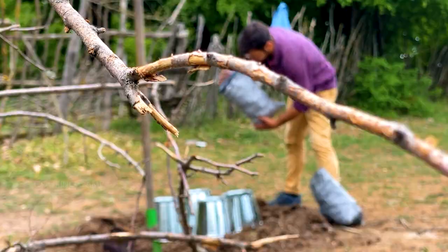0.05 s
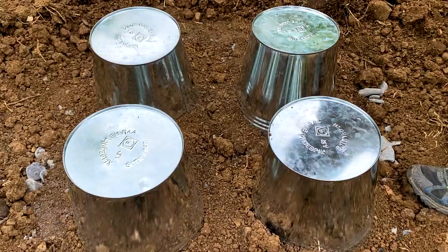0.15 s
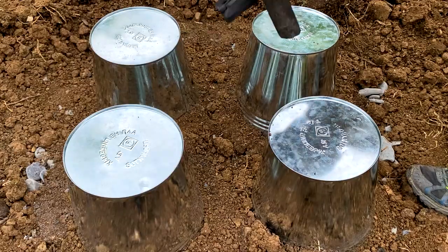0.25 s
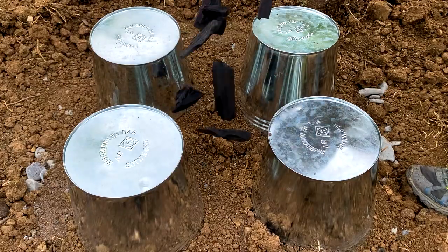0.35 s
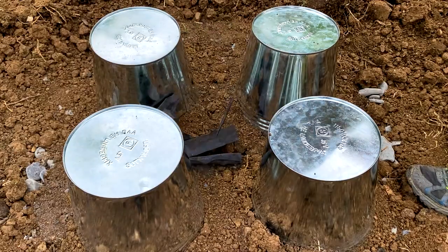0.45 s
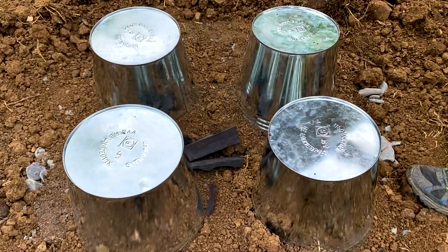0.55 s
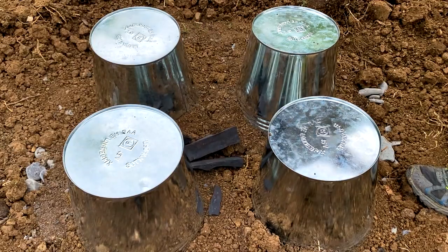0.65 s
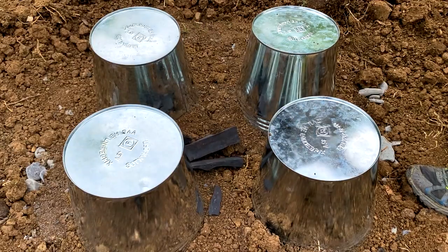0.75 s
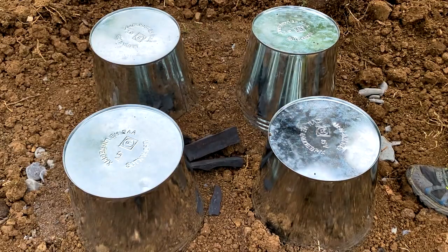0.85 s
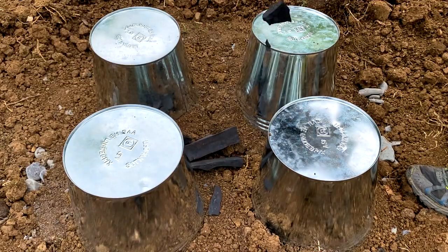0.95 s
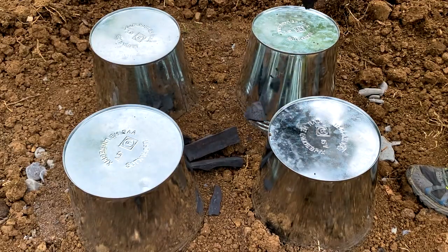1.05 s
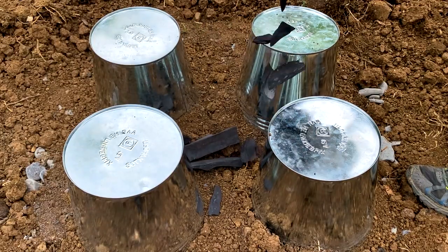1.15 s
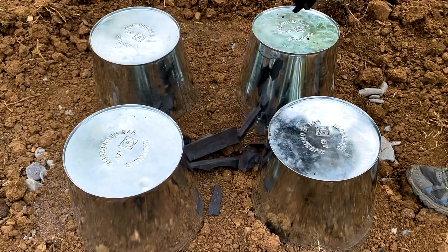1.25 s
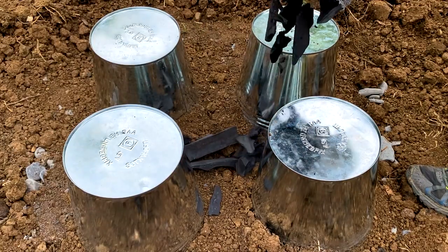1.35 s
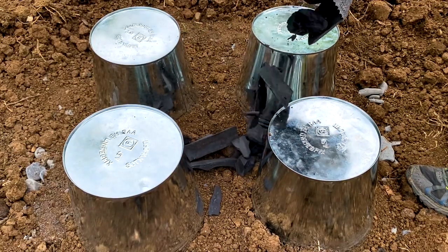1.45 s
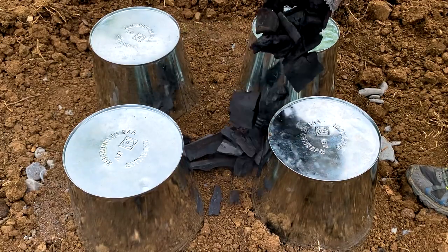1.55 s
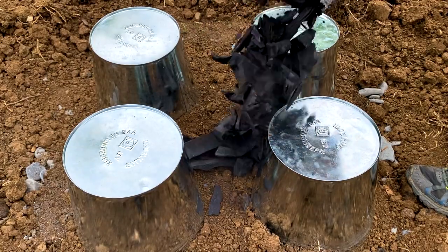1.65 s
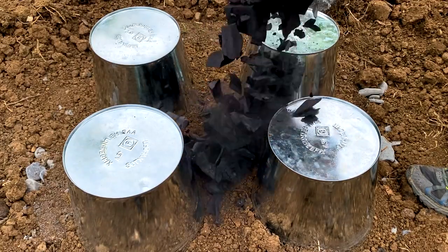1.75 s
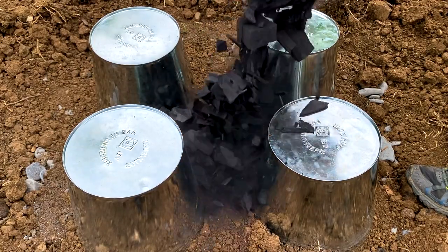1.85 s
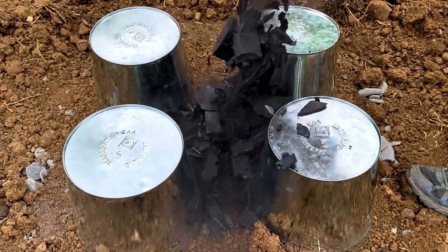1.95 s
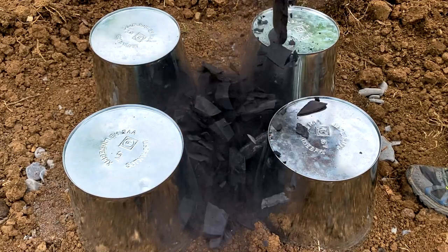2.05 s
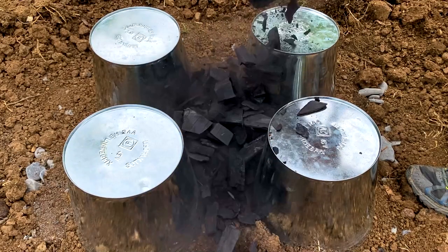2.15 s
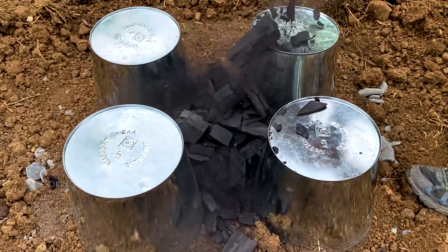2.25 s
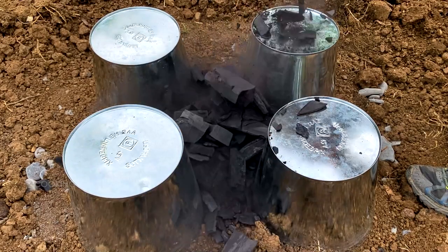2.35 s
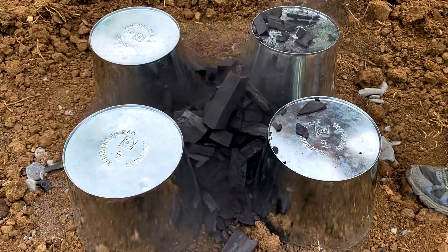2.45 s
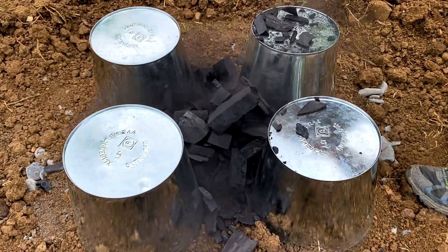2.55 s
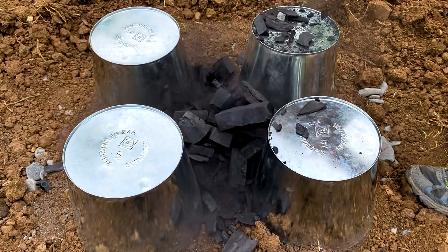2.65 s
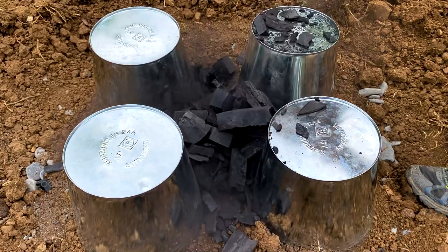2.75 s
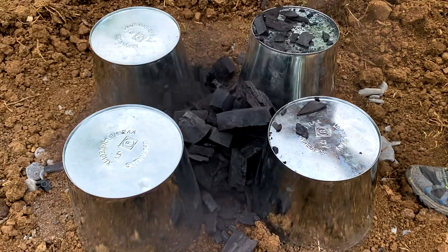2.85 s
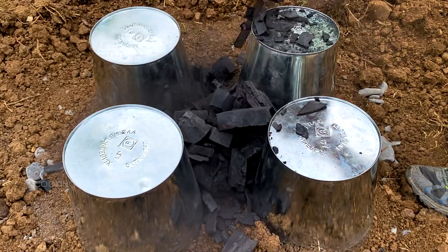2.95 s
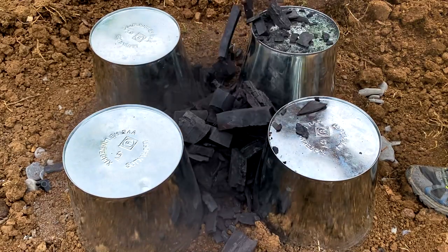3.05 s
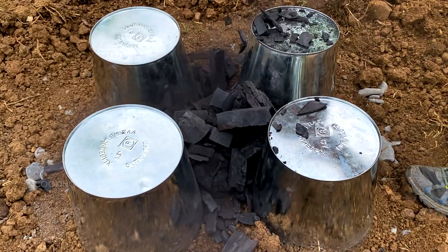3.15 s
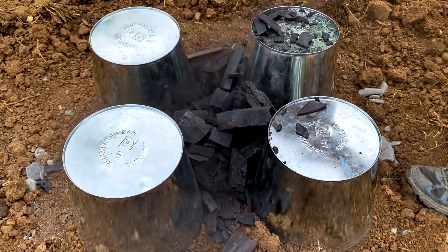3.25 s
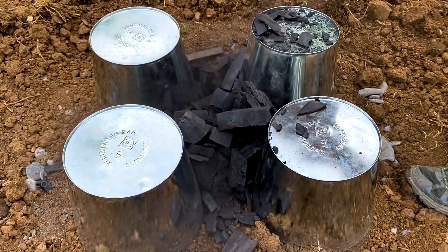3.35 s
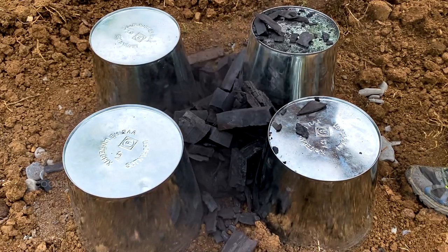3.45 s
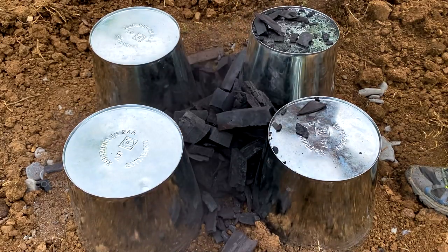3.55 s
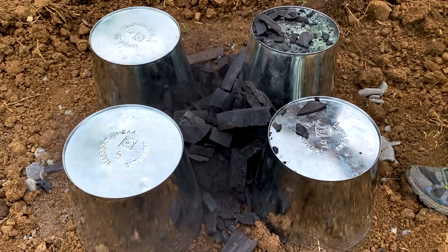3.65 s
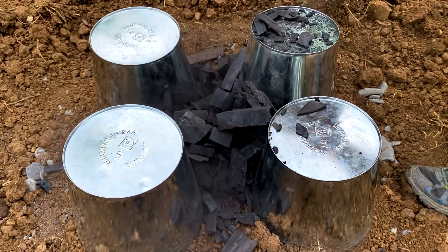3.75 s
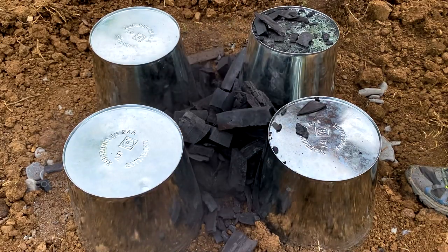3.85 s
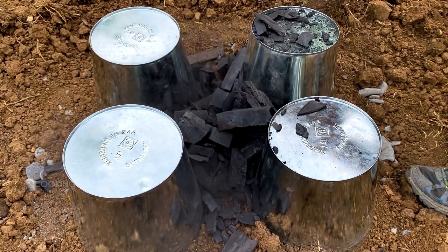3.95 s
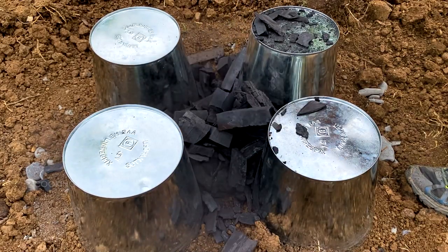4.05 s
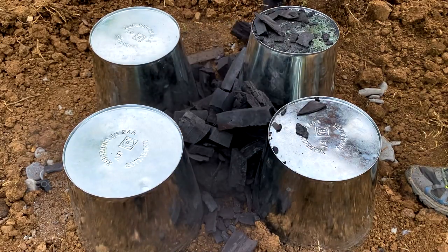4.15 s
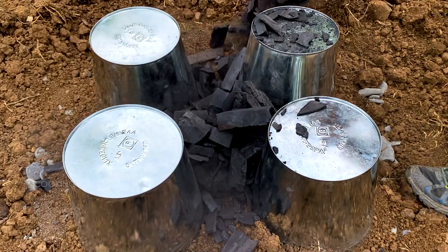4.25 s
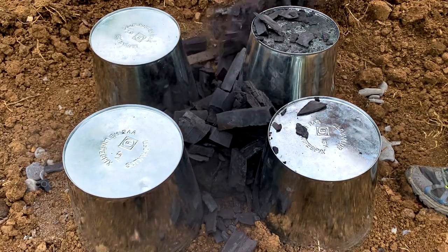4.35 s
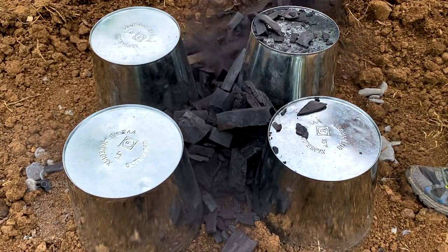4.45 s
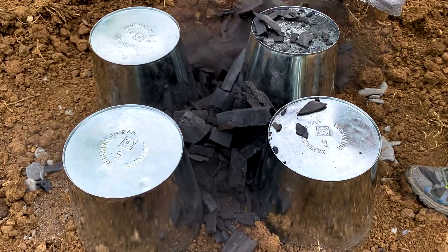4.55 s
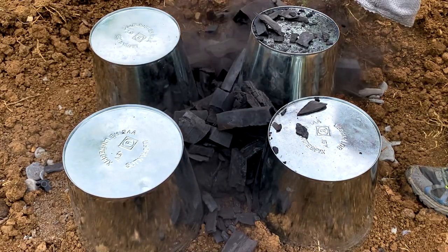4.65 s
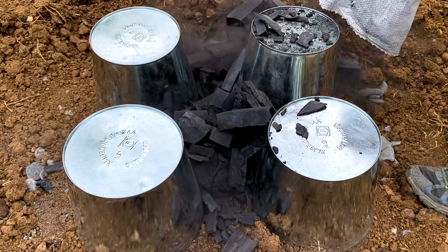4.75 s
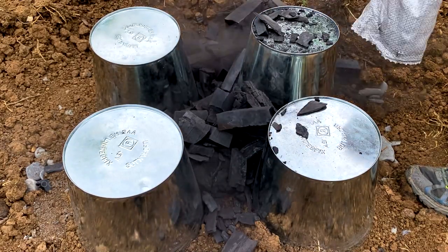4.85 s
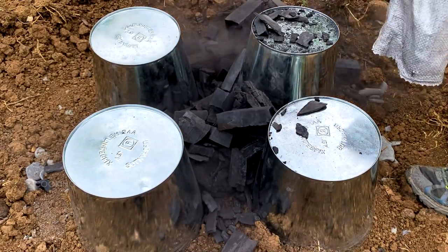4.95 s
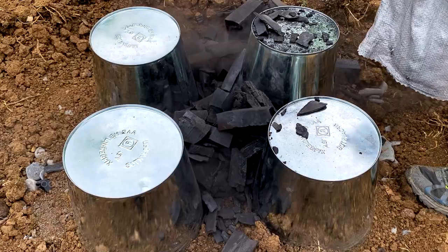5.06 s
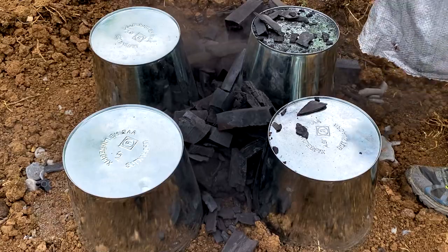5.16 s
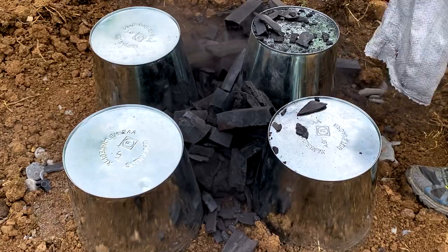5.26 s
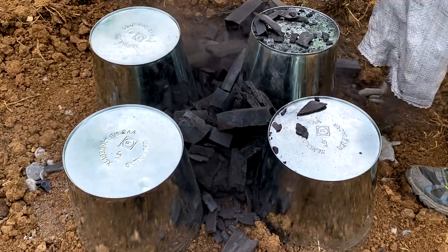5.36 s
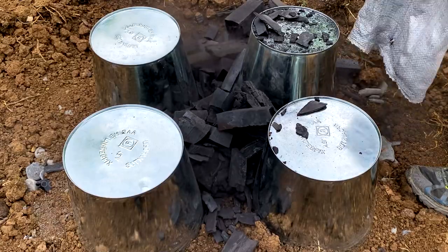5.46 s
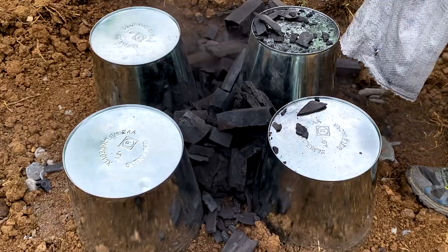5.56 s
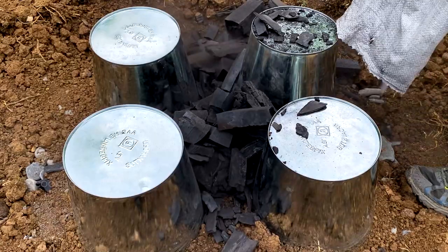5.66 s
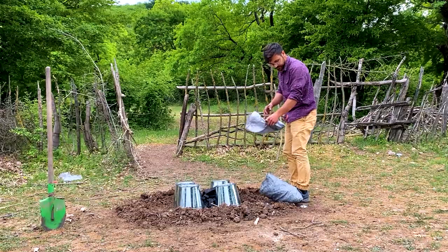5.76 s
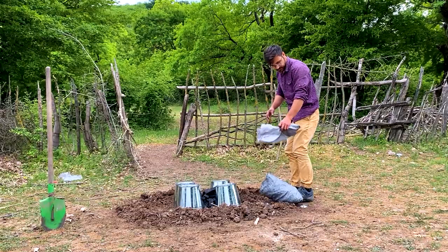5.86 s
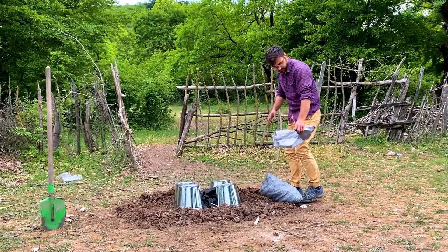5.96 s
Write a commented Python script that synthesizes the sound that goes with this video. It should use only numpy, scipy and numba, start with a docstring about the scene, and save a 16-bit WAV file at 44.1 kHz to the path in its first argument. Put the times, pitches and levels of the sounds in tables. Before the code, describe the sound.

Outdoors, charcoal pours in clattering bursts among upturned metal buckets, with dull thuds, brief metallic rings and gritty rustle thinning to near silence.

```python
"""Charcoal lumps slide out of a woven sack in surges and drop between upturned metal buckets on bare soil.
Brittle lumps crack into many short tones and clink; heavy ones thud with a low ring that swells and dies.
A few blows set the ringing tones of a bucket going. Grit and the sack rustle as a dense rain of tiny tones.
Behind it lie quiet open air and a far-off bass rumble, both made of filtered noise."""
import sys
import numpy as np
from scipy import signal
from scipy.fft import rfft, irfft
from scipy.io import wavfile
from scipy.ndimage import uniform_filter1d
from numba import njit

SR = 44100
rng = np.random.default_rng(int(sys.argv[2]) if len(sys.argv) > 2 else 0)


def file_out(sig):
    """Save sig as 16-bit WAV at sys.argv[1]."""
    # one column per channel
    cols = np.atleast_2d(sig).T
    # limit, then scale
    lim = np.clip(cols, -1, 1)
    pcm = np.round(lim * 32767).astype(np.int16)
    wavfile.write(sys.argv[1], SR, pcm)


N = 264908  # length in samples

# Table levels are relative settings: each layer trims them further.
# Spectrum of the open air: pitch_hz, density_db (per Hz)
AIR_SPECTRUM = [(90, -20), (150, -1), (1300, 0), (2500, -9), (16000, -13)]
# Far-off bass rumble over time: time_s, level_db
RUMBLE_LEVEL = [(0, -59), (1.05, -60), (1.3, -59), (5.719, -64.5), (5.8, -57)]
# Rustle of the sack and trickling grit: time_s, level_db, body_db (low chips beside the level)
RUSTLE_FLOW = [(.14, -40, -6), (.3, -46.5, 9), (.39, -52.5, 9), (.65, -44, 6), (1.0, -42.5, 9),
               (1.2, -37, 0), (1.42, -41, 10), (2.63, -43.5, 10), (3.1, -44.5, -3), (3.78, -44.5, 9.5),
               (4.66, -42.5, -52), (4.86, -47, 6), (5.199, -48.5, -26), (5.76, -52.5, 3)]
# Surges of charcoal out of the sack:
# start_s, length_s, first_level_db, last_level_db, body_db, treble_db
SACK_SURGES = [(0.417, 0.076, -23.5, -23, 8.5, -11), (1.27, 0.046, -26, -28.5, 6, -4),
               (1.438, 0.097, -28, -21, 2.5, -2), (1.591, 0.098, -24, -21.5, 6.5, -8),
               (1.736, 0.31, -23, -17.5, 5, -2.5), (2.118, 0.12, -28.5, -24.5, 10, -3),
               (2.224, 0.32, -35.5, -33.5, 11.5, -4.5), (2.839, 0.15, -37.5, -59, 8, 8),
               (3.261, 0.062, -34.5, -38, 5, -3.5), (3.837, 0.61, -39.5, -27, 2, 2.5),
               (4.456, 0.11, -19, -25, -1, -7), (5.318, 0.19, -53, -43.5, -19, 6)]
# Colour of the chips by pitch: pitch_hz, level_db
CHIP_COLOUR = [(250, -12), (1300, 0.5), (2800, 1.5), (6000, 1), (10500, -2), (15500, 1.5)]
# Ringing tones (modes), one list for each of three buckets: pitch_hz, level_db, t60_s (time to fall 60 dB)
BUCKET_MODES = [
    [(217, -17.5, 1.1), (471.5, -5, 0.62), (528, -3.5, 0.5), (607, -8, 0.57), (960, -11, 0.75),
     (1400, -16, 0.4), (1599, -13.5, 0.59)],
    [(603, -3, 0.46), (676, 8, 0.3), (1480, -4, 0.38), (2350, 2, 0.29), (2751, -4, 0.36)],
    [(170, -2, 0.27), (417, -2.5, 0.066), (760, -4, 0.16)],
]
# Lumps striking a bucket, one list for each bucket:
# start_s, blow_db, hardness_db (per octave above 600 Hz)
BUCKET_BLOWS = [
    [(.415, -39, 2), (.49, -30, -0.5)],
    [(2.125, -35.5, 0), (3.145, -32.5, -0.5)],
    [(2.245, -36, -6), (2.30, -19.5, 5), (2.405, -25.5, -2.5)],
]
# Heavy lumps landing on soil or heap: start_s, level_db, pitch_hz
HEAVY_LANDINGS = [(0.415, -31, 114), (0.416, -12.5, 340), (1.439, -22.5, 158), (1.441, -15, 372),
                  (1.605, -24, 173), (1.64, -16, 360), (1.643, -14.5, 151), (1.711, -12.5, 196),
                  (1.806, -21, 133), (1.839, -18, 188), (2.149, -29, 142), (2.242, -14.5, 380),
                  (2.245, -14, 140), (2.303, -20, 179), (2.374, -16, 178), (1.711, -16.5, 366),
                  (1.761, -21, 420), (2.043, -35, 175), (3.018, -31.5, 212), (3.143, -25.5, 171),
                  (4.23, -32.5, 117)]
# Lumps knocking together:
# start_s, level_db, body_db, treble_db, clink_hz, clink_db (beside the level), crumble_s
LUMP_KNOCKS = [(0.228, -43, -20, 3, 1150, 10, 0.038), (0.2695, -37, -21, 10, 1360, 0, 0.029),
               (0.4056, -30, 7, 5, 2970, -4, 0.037), (0.4122, -10.5, 2.5, -9.5, 3170, -9.5, 0.13),
               (0.4474, -22, 8, 0, 936, -2, 0.12), (0.4904, -30, 4, 2, 2080, 1, 0.17),
               (0.718, -42, 8, 8.5, 1223, 3, 0.12), (0.983, -34.5, 9, -23, 5150, 9, 0.056),
               (1.118, -24.5, 4.5, 6, 6560, 8.5, 0.041), (1.253, -33, -6, 8, 9130, 11, 0.057),
               (1.2995, -33, -6, 13.5, 1280, 6, 0.084), (1.3267, -25.5, -23, 1, 9830, 4, 0.028),
               (1.3546, -29.5, -6, 3, 14650, 19, 0.053), (1.372, -23.5, -51, 3.5, 2350, -1, 0.053),
               (1.438, -21.5, -33, -4, 1770, -3.5, 0.072), (1.4933, -21, -27, 0.5, 2570, 0, 0.11),
               (1.536, -21.5, -32, -34, 3960, 0.5, 0.13), (1.5795, -20.5, -25, -21, 2160, 12, 0.033),
               (1.597, -22, -6, 5, 2620, -1.5, 0.17), (1.6467, -20, -3, 2.5, 3550, 9.5, 0.045),
               (1.6607, -19.5, -22, 4.5, 1613, 1, 0.12), (1.702, -25.5, 4, -20, 890, 13, 0.058),
               (1.711, -14, 8.5, -6.5, 2135, -4, 0.13), (1.727, -29, -25, -26, 3370, 18, 0.052),
               (1.758, -27, 0, -8, 2660, 7, 0.098), (1.7961, -17, 8.5, 0.5, 2720, -5, 0.14),
               (1.8355, -17.5, 8, -7, 958, 3, 0.16), (1.897, -24.5, 13, 8.5, 2470, -8, 0.046),
               (1.9687, -19.5, -7, -4, 2980, -4, 0.11), (2.0206, -28.5, 8, -14, 998, 10.5, 0.09),
               (2.04, -18.5, -6, -1, 1937, 0, 0.085), (2.113, -20, -38, -6, 2500, -10, 0.21),
               (2.2457, -22.5, 21, -2, 1540, 10, 0.034), (2.3002, -23, 14.5, -6, 1380, 1, 0.25),
               (2.3671, -25, 21.5, -1.5, 970, 2, 0.11), (2.41, -30, 19, -20, 1596, 2, 0.18),
               (2.5091, -22.5, 13.5, -12, 1640, 1, 0.12), (2.581, -36, -20, -12, 2290, 9, 0.055),
               (2.6939, -31.5, 15.5, -30, 1425, 0, 0.094), (2.931, -28.5, -6, -8, 3740, -9, 0.13),
               (2.9515, -26, 6, 1, 1447, 7, 0.074), (3.0164, -32, 12.5, 2.5, 1640, -13, 0.15),
               (3.074, -33, -1, -7, 1450, -4.5, 0.16), (3.1422, -21.5, 14, 1.5, 2760, -8, 0.12),
               (3.203, -31, 16.5, -4, 1415, -4, 0.13), (3.288, -43.5, -8, -21, 1550, 13, 0.15),
               (3.309, -34.5, -8, -12, 2200, 7, 0.13), (3.4805, -50.5, -31, 8, 4600, 30.5, 0.005),
               (3.9455, -32.5, -34, -11, 4220, 4, 0.092), (4, -36.5, 5, 7, 9460, 12, 0.026),
               (4.2551, -30, -22, -5, 4860, 12, 0.029), (4.301, -26, 4, -16, 3120, 6, 0.03),
               (4.357, -19, -15, 1.5, 3240, -3, 0.088), (4.375, -25, -30, -8, 4070, 5, 0.041),
               (4.4545, -23.5, -26, -16, 1633, 4.5, 0.2), (4.48, -29, -22, -13, 2640, 15, 0.052),
               (4.501, -20, -35, 2, 2920, 2, 0.069), (4.7072, -45, -32, 10.5, 9800, 16, 0.011),
               (4.739, -41.5, -26, -17, 3740, 1, 0.033), (4.814, -42.5, 9, 7, 940, -16, 0.096),
               (4.844, -46, 24.5, 4, 625, -17, 0.066), (5.3282, -45.5, -20, 0, 5430, 7, 0.047),
               (5.961, -59.5, 22, -19, 990, 21, 0.047)]

AIR_DB = -56
BODY_FULL_HZ, BODY_NONE_HZ = 550, 1300  # body colour fades in below the second
TREBLE_NONE_HZ, TREBLE_FULL_HZ = 6500, 11000  # treble colour fades in above the first
RUSTLE_TREBLE_DB = 4
NEAR_START_S, NEAR_END_S = 0.141, 5.765  # the rustle is fainter outside these times
BEFORE_DB, AFTER_DB = -16, -42  # how much fainter
RISE_DB_PER_S, FALL_DB_PER_S = 1499, 232  # a surge sets in fast and peters out
THUD_CYCLES = 11  # a thud's ring falls 60 dB in this many swings
THUD_BUILD = 0.35  # build-up time as a share of the ring
SHAKE = 0.995  # how much of the ground's push is left one sample later
TOP_HZ = 15950  # the recorder cuts everything above


def undb(db):
    """Turn decibels into a plain amplitude factor."""
    return 10 ** (np.asarray(db) / 20)


@njit
def add(out, at, hz, t60, size):
    """Add dying sines of complex size (amount and phase), each run until it has fallen 50 dB."""
    for k in range(len(at)):
        step = np.exp(2j * np.pi * hz[k] / SR - np.log(1000) / (t60[k] * SR))
        swing = size[k]
        for i in range(at[k], min(len(out), at[k] + int(t60[k] * SR * 5 / 6))):
            out[i] += swing.imag
            swing *= step


def coloured(points):
    """Steady noise of rms 1, shaped to a spectrum of (pitch, dB) points."""
    hz, db = np.transpose(points)
    f = np.maximum(np.arange(N // 2 + 1) * SR / N, 1)
    gain = undb(np.interp(np.log(f), np.log(hz), db))
    noise = irfft(rfft(rng.standard_normal(N)) * gain, N)
    return noise / np.std(noise)


def air():
    """Quiet open air: a steady hiss, and bass noise whose level slowly changes."""
    s, db = np.transpose(RUMBLE_LEVEL)
    rumble_level = undb(np.interp(np.arange(N) / SR, s, db))
    rumble = rumble_level * coloured([(35, -37), (60, -7), (95, -4.0), (140, -5.5), (300, -65)])
    return undb(AIR_DB) * coloured(AIR_SPECTRUM) + rumble


def flow_at(s):
    """Level, body and treble of the stream at times s: powers add up and the louder part sets the colour."""
    t, db, body_db = np.transpose(RUSTLE_FLOW)
    far_db = (s < NEAR_START_S) * BEFORE_DB + (s > NEAR_END_S) * AFTER_DB
    power = undb(2 * (np.interp(s, t, db) + far_db))
    body = power * np.interp(s, t, body_db)
    treble = power * RUSTLE_TREBLE_DB
    for start, length, first_db, last_db, body_db, treble_db in SACK_SURGES:
        db = np.interp(s, [start, start + length], [first_db, last_db])
        db = db - RISE_DB_PER_S * np.maximum(start - s, 0)
        db = db - FALL_DB_PER_S * np.maximum(s - start - length, 0)
        surge = undb(2 * db)
        power = power + surge
        body = body + surge * body_db
        treble = treble + surge * treble_db
    return 10 * np.log10(power), body / power, treble / power


def grains(s, level_db, body_db, treble_db, ring_s, scatter_db, out):
    """Chips of random pitch, each a short dying tone; a few are much larger than the rest."""
    u = rng.random(len(s))
    luck, ring = rng.exponential(size=len(s)), rng.exponential(size=len(s))
    hz = 230 * (15900 / 230) ** (u ** .55)  # small, high chips are the most numerous
    colour_hz, colour_db = np.transpose(CHIP_COLOUR)
    mid = level_db + np.interp(np.log(hz), np.log(colour_hz), colour_db)
    # how far each chip lies in the body or in the treble, 0 to 1
    low = np.clip(np.log(BODY_NONE_HZ / hz) / np.log(BODY_NONE_HZ / BODY_FULL_HZ), 0, 1)
    high = np.clip(np.log(hz / TREBLE_NONE_HZ) / np.log(TREBLE_FULL_HZ / TREBLE_NONE_HZ), 0, 1)
    db = mid + low * body_db + high * treble_db + scatter_db * np.minimum(luck - 1, 4)
    t60 = ring_s * (0.073 + ring) * (1000 / hz) ** 0.11  # higher chips die sooner
    # a hard contact starts at full swing (1j); longer rings carry the same energy
    size = 1j * undb(db) * np.sqrt(ring_s / t60)
    add(out, (s * SR).astype(np.int64), hz, t60, size)


def buckets():
    """Every blow excites the modes of its bucket; a hard, small lump brings out the upper ones."""
    out = np.zeros(N)
    for modes, blows in zip(BUCKET_MODES, BUCKET_BLOWS):
        hz, db, t60 = np.transpose(modes)
        for s, blow_db, hard_db in blows:
            place_db = 1.0 * rng.standard_normal(len(hz))  # the place of the blow varies
            size = undb(blow_db + db + place_db + hard_db * np.log2(hz / 600)) + 0j
            add(out, np.full(len(hz), int(s * SR)), hz, t60, size)
            # the lump bounces and dents split each mode, so the ring wavers
            late = s + 0.02 * rng.random(len(hz))
            split_hz = hz * (1 + 0.016 * rng.standard_normal(len(hz)))
            add(out, (late * SR).astype(np.int64), split_hz, t60, size * undb(-9.0))
    # loose grit on the metal breaks up the ring
    loose = uniform_filter1d(np.repeat(rng.standard_normal(N // 600 + 1), 600), 600)[:N]
    return out * undb(3.4 * loose)


def thuds():
    """Soft landings: a low ring that swells in and dies away; the lower the tone, the later it peaks."""
    out = np.zeros(N)
    s, level_db, hz = np.transpose(HEAVY_LANDINGS)
    at = (s * SR).astype(np.int64)
    size = 2 * undb(level_db) + 0j
    add(out, at, hz, THUD_CYCLES / hz, size)
    add(out, at, hz, THUD_BUILD * THUD_CYCLES / hz, -size)  # taken away at first: the build-up
    push = np.abs(out) * out + out ** 2  # grows with the square, so the heaviest shake the ground
    return out + signal.lfilter([.0025], [1, -SHAKE], push)


def stream(count=420, size=24):
    """A dense hiss of grit that slips unevenly, and many small lumps that tick and ring on in short tones."""
    out = np.zeros(N)
    s = rng.random(90000) * (N - 1) / SR
    level_db, body_db, treble_db = flow_at(s)
    slips = uniform_filter1d(np.repeat(rng.standard_normal(N // 700 + 1), 700), 400)
    grit_db = level_db - 10 + 1.97 * slips[(s * SR).astype(int)]
    grains(s, grit_db, body_db, treble_db, ring_s=0.0075, scatter_db=2.0, out=out)
    # each small lump is a tight cluster of chips
    lump_s = np.repeat(rng.random(count) * (N - 1) / SR, size)
    s = lump_s + 0.0087 * rng.random(count * size) ** 2
    blow_db = np.repeat(2.03 * np.minimum(rng.exponential(size=count), 1.8), size)
    level_db, body_db, treble_db = flow_at(s)
    grains(s, level_db - 18.5 + blow_db, body_db, treble_db, ring_s=0.046, scatter_db=4.5, out=out)
    return out


def knocks(count=200, size=40):
    """Each knock is a sharp crack that holds for a moment and crumbles away in chips, with one clear clink."""
    out = np.zeros(N)
    s, level_db, body_db, treble_db, hz, clink_db, crumble_s = np.transpose(LUMP_KNOCKS)

    def spread(column):
        return np.repeat(column, count)

    # delay of each chip as a share of the crumbling time
    late = rng.random((len(s), count)) ** 1.3 * .5
    at = spread(s) + (late * np.clip(crumble_s, .005, .6)[:, None]).ravel()
    chip_db = spread(level_db - 7.0) - 90 * late.ravel() ** 1.476  # later chips are fainter
    ring_s = spread(0.018 + 0.055 * crumble_s)  # lumps that crumble longer also ring longer
    grains(at, chip_db, spread(body_db), spread(treble_db), ring_s, scatter_db=3.0, out=out)
    # the first contact snaps, brief knocks the hardest
    snap = np.repeat([s, level_db - 45 * crumble_s, treble_db], size, axis=1)
    snap_s = snap[0] + .001 * rng.random(snap.shape[1])
    grains(snap_s, snap[1] - 7.5, -34.0, snap[2], ring_s=0.0069, scatter_db=0.5, out=out)
    clink_t60 = np.minimum(3.6 / np.sqrt(hz), 0.68 * crumble_s)
    clink_size = undb(level_db + clink_db - 3.5)
    for bounce in range(3):  # the lump chatters, so its clink is struck again
        at = s + bounce * .035 * crumble_s * (.5 + rng.random(len(s)))
        add(out, (at * SR).astype(np.int64), hz, clink_t60, clink_size * 1j ** bounce)
    return out


def scene():
    """All layers add up in the air as one mono sound."""
    near = stream() + knocks() + buckets()
    # lumps this small radiate no deep bass; the lowest tones that remain arrive a little late
    near = signal.sosfilt(signal.butter(4, 100, "high", fs=SR, output="sos"), near)
    return (near + thuds() + air())[None]


def record(dry):
    """The recorder rounds the loudest peaks and cuts the top."""
    x = 0.69 * np.tanh(dry / 0.62)
    return signal.sosfilt(signal.ellip(12, .2, 80, TOP_HZ, fs=SR, output="sos"), x)


dry = scene()
out = record(dry)
file_out(out)
```